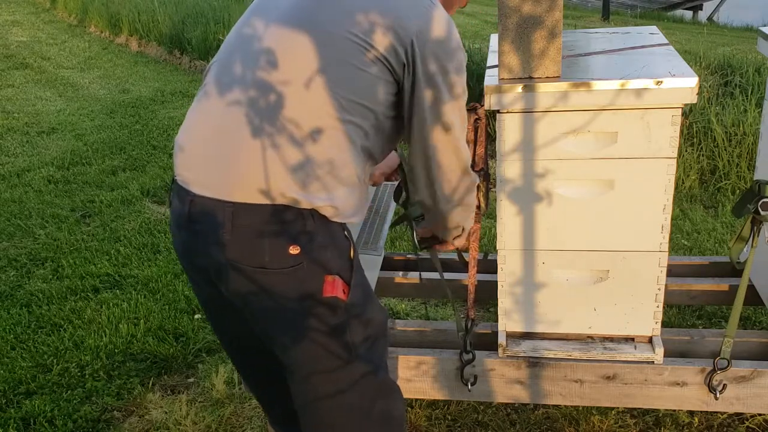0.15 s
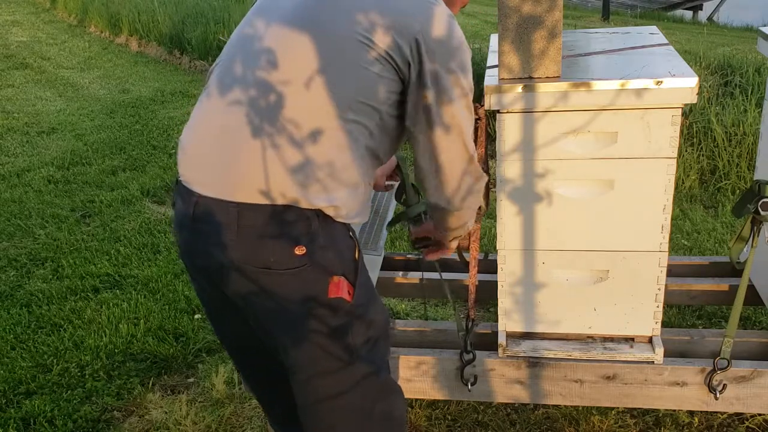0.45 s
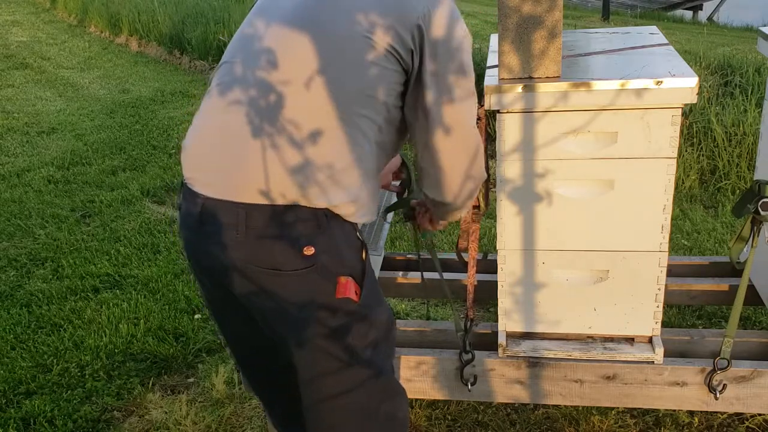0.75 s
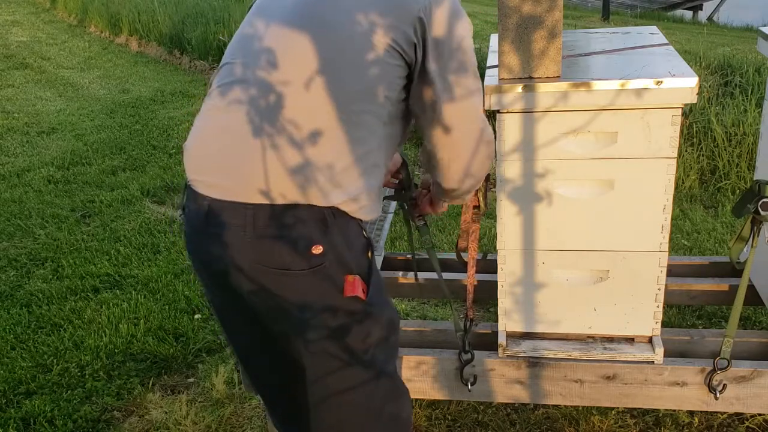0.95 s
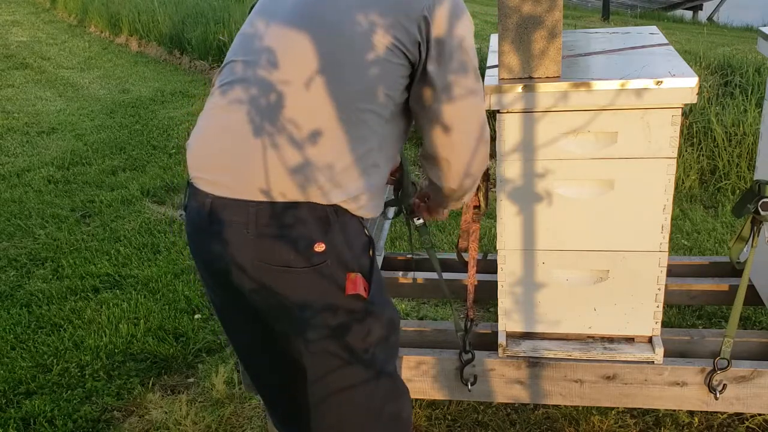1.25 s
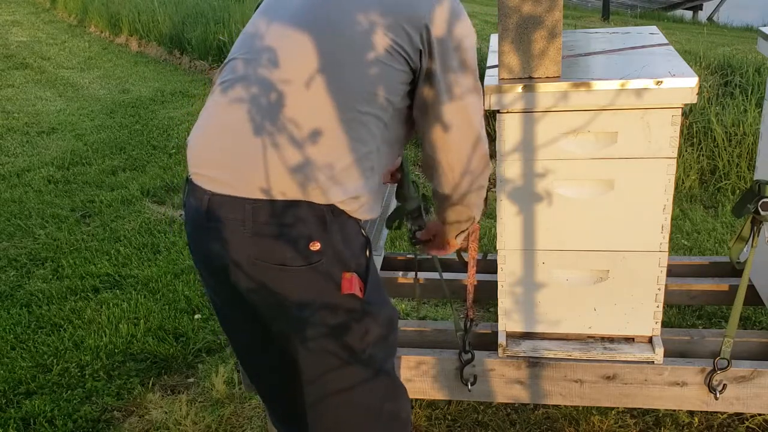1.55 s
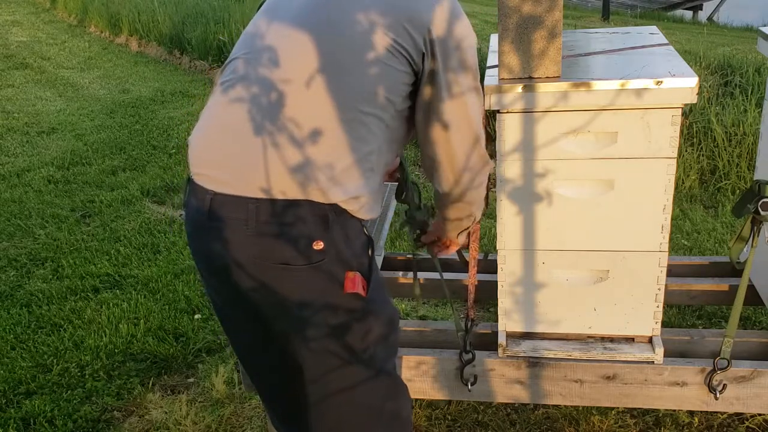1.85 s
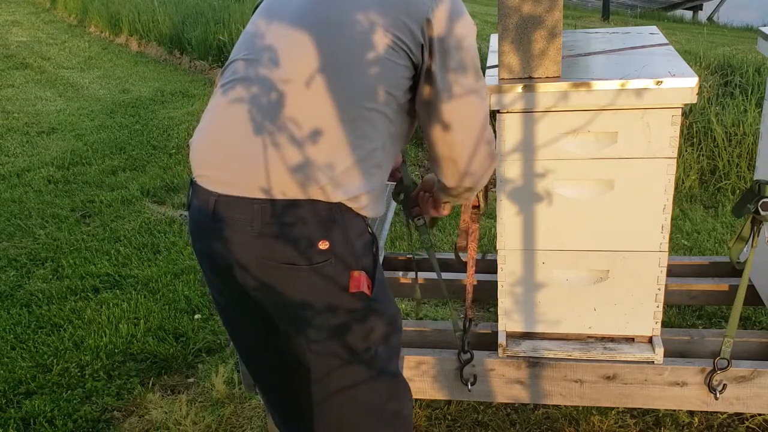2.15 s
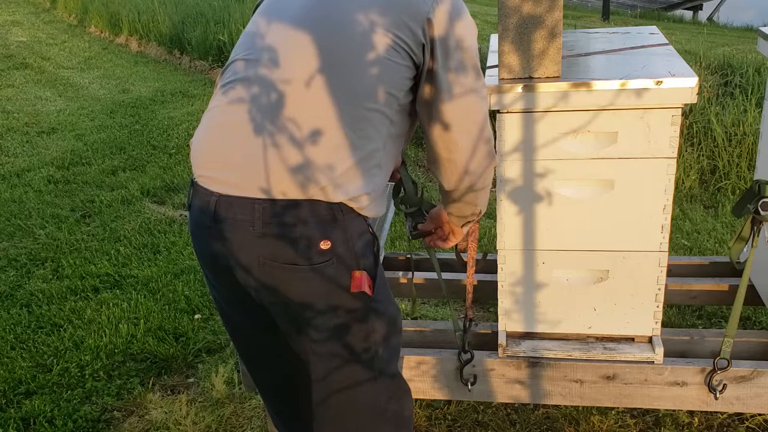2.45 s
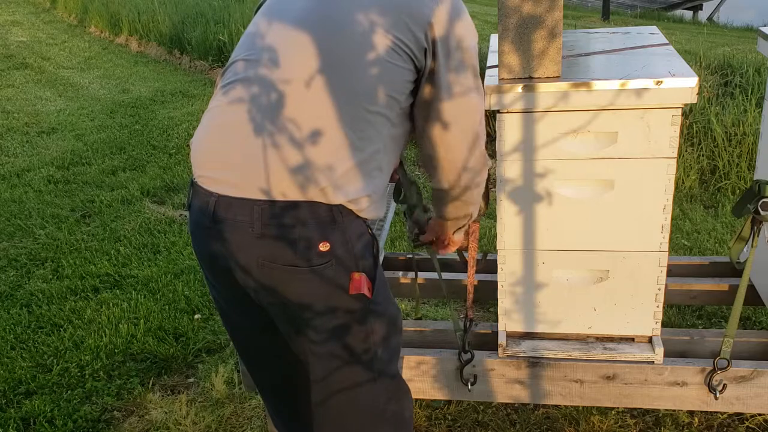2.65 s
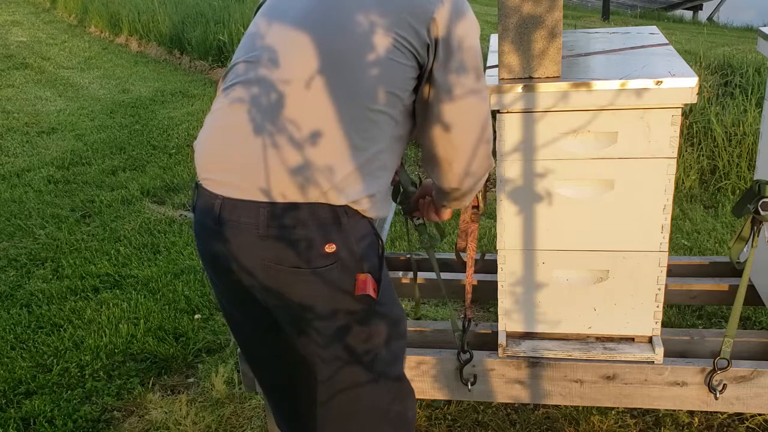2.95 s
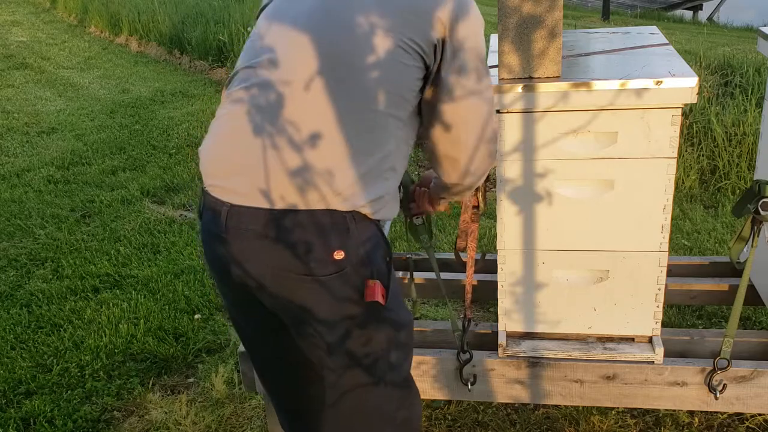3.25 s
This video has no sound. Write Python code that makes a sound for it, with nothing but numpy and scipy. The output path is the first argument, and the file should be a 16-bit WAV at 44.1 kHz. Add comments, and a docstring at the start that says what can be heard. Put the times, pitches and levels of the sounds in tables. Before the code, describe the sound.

Irregular steel ratchet snaps with short squeaks and woody thuds, faint birdsong on a lawn

```python
"""On a lawn, a ratchet strap is cranked tight round a wooden beehive, a few metres away.
Filtered noise bursts make the pawl's snaps, steel scrapes and webbing creaks; the axle squeals in harmonics.
Each tug knocks the boxes, as a noise push through a bank of wooden modes, while handling rustles low.
The yard scatters it in diffuse echoes; songbirds whistle as gliding sines far off over an outdoor rumble."""
import sys
import numpy as np
from scipy import signal
from scipy.fft import rfft, irfft
from scipy.io import wavfile
from scipy.ndimage import uniform_filter1d

SR = 44100
rng = np.random.default_rng(int(sys.argv[2]) if len(sys.argv) > 2 else 0)


def bounce(signal):
    """Save signal as a 16-bit WAV file at the path given by the first command-line argument."""
    frames = np.transpose(np.atleast_2d(signal))
    limited = np.clip(frames, -1, 1)
    pcm = np.round(limited * 32767).astype(np.int16)
    wavfile.write(sys.argv[1], SR, pcm)


N = 149940  # samples, 3.4 s

# Spectrum of the frame's chatter and of the squeaks' rasp, with broad resonances: freq_hz [Hz], gain_db [dB, relative]
FRAME_COLOUR = [(400, -22.5), (1100, -22.5), (1700, -11.5), (2050, -10), (2500, -6), (2900, -5.5),
                (3320, 2), (3700, -5), (4200, 0), (5000, -1.5), (8000, -7), (16000, -15.5)]
SLIDE_RELEASE_S = 0.0056  # decay constant shared by scrapes and creaks
SNAP_RISE_S, SLIDE_RISE_S = 0.00014, 0.00088  # rise constants: a hard snap, a softer slide
LEFT_RIGHT = np.array([[1], [-1]])


def undb(db):
    """Amplitude factor of a level in dB."""
    return 10 ** (np.asarray(db) / 20)


def unit(x):
    """Scaled to rms 1."""
    return x / np.sqrt(np.mean(x ** 2))


def clock():
    """Time of every sample in seconds."""
    return np.arange(N) / SR


def through(x, response):
    """Sound x heard through an impulse response."""
    return signal.fftconvolve(x, response)[:N]


def colour(x, points):
    """Causal minimum-phase filter through (Hz, dB) points that keeps the power of white noise."""
    hz, db = np.array(points).T
    size = 2048
    f = np.maximum(np.arange(size // 2 + 1) * SR / size, 1)
    log_gain = np.log(undb(np.interp(np.log(f), np.log(hz), db)))
    # folding the cepstrum forward in time makes the response causal
    cepstrum = irfft(log_gain)
    cepstrum[1:size // 2] *= 2
    cepstrum[size // 2 + 1:] = 0
    response = irfft(np.exp(rfft(cepstrum)))
    return through(x, response / np.linalg.norm(response))


def walk(rate_hz):
    """Smooth random motion with rms 1, drawn afresh at rate_hz."""
    step = max(int(SR / rate_hz), 1)
    held = rng.standard_normal(N)[np.arange(N) // step]
    return unit(uniform_filter1d(uniform_filter1d(held, step), step))


def gate(start_s, length_s, release_s, rise_s):
    """Envelope: a quick exponential swell up to the start, on for a length, then an exponential release."""
    age = clock() - start_s
    rise = np.minimum(age / rise_s, 0)
    release = np.maximum((age - length_s) / release_s, 0)
    return np.exp(np.maximum(rise - release, -50))


def grit():
    """Dense micro-impacts of uneven size: noise whose level flickers fast."""
    spread_db = 3.5
    return unit(rng.standard_normal(N) * undb(spread_db * walk(1500)))


def ring(modes):
    """Impulse response of a table of decaying sine modes, half a second long, with energy 1."""
    t = clock()[:SR // 2]
    response = sum(undb(db - 60 * t / t60) * np.sin(2 * np.pi * hz * t) for hz, db, t60 in modes)
    return response / np.linalg.norm(response)


def scatter(x, t60_s):
    """Diffuse echoes as decaying noise, different left and right, after a 1.1 ms gap."""
    t = clock()[:SR]
    tails = rng.standard_normal((2, SR)) * np.exp(-np.log(1000) * t / t60_s) * (t > 0.0011)
    return np.array([through(x, tail / np.linalg.norm(tail)) for tail in tails])


def outdoors():
    """Low rumble, nearly alike in both ears, swelling slowly under a thin, wider hiss."""
    # Spectrum of the open air: freq_hz [Hz], gain_db [dB, relative]
    rumble_colour = [(20, -30.5), (40, -0.5), (62, 4), (115, 1), (180, -12), (280, -20), (500, -35.5),
                     (1000, -39.5), (2500, -40), (4500, -50.5), (8000, -57.5), (13000, -43), (17000, -50.5)]
    level_db, swell_db = -53.5, 3.14
    hz, db = np.array(rumble_colour).T
    f = np.maximum(np.arange(N // 2 + 1) * SR / N, 1)
    gain = undb(np.interp(np.log(f), np.log(hz), db))
    mid, side = rfft(rng.standard_normal((2, N))) * gain
    # the stereo width grows with pitch
    side = side * np.clip(f / 1800, .06, .8)
    air = unit(irfft(np.array([mid + side, mid - side]), N))
    return undb(level_db - swell_db * walk(6)) * air


def birds():
    """Distant whistles: gliding, wavering sines that flutter in level, blurred by the trees."""
    # Bird notes: start_s [s], length_s [s], start_hz [Hz], end_hz [Hz], level_db [dB, before flutter and echo]
    notes = [(0, 0.1, 3090, 3245, -68), (0.329, 0.095, 2206, 2860, -67.5), (0.395, 0.051, 3200, 2750, -71),
             (0.409, .08, 2630, 2105, -65), (0.468, 0.12, 2860, 2620, -71.5),
             (0.529, 0.11, 2420, 1984, -61.5), (0.635, .07, 3050, 2570, -70.5), (.76, .13, 2450, 2177, -69),
             (0.956, 0.073, 3550, 3300, -67), (1.495, 0.085, 3020, 2400, -67),
             (1.634, 0.046, 2500, 2170, -67), (1.77, 0.08, 2802, 2928, -64), (1.86, 0.096, 3100, 3400, -70),
             (2.034, 0.077, 2490, 2280, -72), (2.345, .11, 3345, 2710, -60), (2.606, .08, 2930, 2416, -65),
             (2.739, 0.063, 2597, 2296, -65.5), (2.753, 0.14, 3410, 3470, -64.5),
             (3.002, 0.086, 3020, 2620, -66.5), (3.097, 0.16, 3316, 3403, -64.5),
             (3.28, 0.27, 3270, 3250, -72), (3.22, 0.44, 2573, 2400, -69)]
    waver_share, echo_db, echo_t60_s = 0.028, 1, 0.47
    t, out = clock(), np.zeros(N)
    waver = walk(160)
    flutter = undb(-2 + 3 * walk(60))
    for start, length, start_hz, end_hz, db in notes:
        on = (t > start) & (t < start + length)
        progress = (t[on] - start) / length
        hz = (start_hz + (end_hz - start_hz) * progress) * (1 + waver_share * waver[on])
        whistle = np.sin(2 * np.pi * np.cumsum(hz) / SR)
        out[on] += undb(db) * np.sin(np.pi * progress) ** .5 * flutter[on] * whistle
    return out + undb(echo_db) * scatter(out, echo_t60_s)


def handling():
    """Low rustle of sleeves and strap while the lever is worked: coloured noise, almost centred."""
    # Loudness of the rustle over time: time_s [s], level_db [dB, before a random flicker]
    rustle_level = [(0, -67.5), (.55, -61.5), (.9, -46), (1.2, -55.5), (1.42, -55), (1.65, -67), (2.0, -56),
                    (2.3, -52), (2.62, -55), (2.78, -63), (3.05, -61.5), (3.4, -60)]
    # Spectrum of the rustle: freq_hz [Hz], gain_db [dB, relative]
    rustle_colour = [(30, -24), (70, 9.5), (200, 3.5), (320, -15), (450, -12.5), (650, -38.5), (1500, -41),
                     (6000, -36.5), (16000, -50)]
    mid = colour(rng.standard_normal(N), rustle_colour)
    side = colour(rng.standard_normal(N), rustle_colour)
    level_db = np.interp(clock(), *np.array(rustle_level).T) + 2.7 * walk(25)
    return undb(level_db) * (mid + .12 * side * LEFT_RIGHT)


def hive():
    """Each tug jostles the boxes: a dull thud, and wooden modes that vary a little at random from knock to knock."""
    # Tugs that knock the boxes: start_s [s], level_db [dB, relative], thud_hz [Hz, sets the band]
    knocks = [(0.769, -41.5, 194), (0.883, -44.5, 226), (.915, -45, 237.3), (1.047, -33, 172),
              (1.066, -41.5, 200), (1.305, -53, 292), (1.467, -32.5, 218), (1.506, -36.5, 296),
              (1.519, -31, 118), (1.613, -34.5, 280), (1.626, -33.5, 173), (1.724, -34, 185.7),
              (2.102, -38.5, 250), (2.124, -36, 195), (2.154, -40.5, 285), (2.194, -31, 280),
              (2.389, -49.5, 412), (2.447, -36, 290), (2.528, -37, 336), (2.544, -31, 162),
              (2.566, -46.5, 404), (2.813, -46.5, 238), (2.85, -45, 396), (2.934, -34, 538),
              (2.955, -46, 402), (2.996, -46, 280), (3.152, -46, 378)]
    # Resonances of hive and stand, before scatter: freq_hz [Hz], level_db [dB, relative], t60_s [s]
    wood_modes = [(67, 1, .25), (98.3, -3.5, 0.18), (195.2, -5, 0.16), (212, -0.5, 0.082),
                  (245.8, -8, 0.12), (278.8, -9.5, 0.14), (362.2, -7, 0.031), (443, 1.5, 0.086),
                  (520, -11.5, 0.044), (742.4, -8.5, 0.11), (878, -6, 0.05)]
    decay_s, rise_s = 0.008, 0.012  # time constants of the push
    shift_share, mode_scatter_db = 0.05, 0.5  # random spread of the modes from knock to knock
    thud_db, trim_db = -9, -14.5  # thud against the ringing; trim of all knocks
    echo_db, echo_t60_s, echo_width = -10.5, 0.37, 0.4
    out, size = np.zeros(N + SR), SR // 2
    t = clock()[:size]
    for start, db, thud_hz in knocks:
        draws = rng.standard_normal((len(wood_modes), 2))
        modes = [(f * (1 + shift_share * a), g + mode_scatter_db * b, t60)
                 for (f, g, t60), (a, b) in zip(wood_modes, draws)]
        force = rng.standard_normal(size) * np.exp(-t / decay_s) * (1 - np.exp(-t / rise_s))
        band = signal.butter(3, [thud_hz / 2.4, thud_hz * 1.47], "band", fs=SR, output="sos")
        ringing = unit(signal.sosfilt(band, through(force, ring(modes))[:size]))
        thud = unit(signal.sosfilt(band, force))
        first = int(start * SR)
        out[first:first + size] += undb(db + trim_db) * unit(ringing + undb(thud_db) * thud)
    mid, side = scatter(out[:N], echo_t60_s)
    return out[:N] + undb(echo_db) * (mid + echo_width * side * LEFT_RIGHT)


def webbing():
    """The strap slips on the spool in tiny jerks: bursts of flickering, coloured grit."""
    # Slips of the webbing: start_s [s], length_s [s, before release], level_db [dB]
    creaks = [(1.498, 0.022, -51.5), (1.617, 0.023, -49.5), (2.127, 0.0066, -53), (2.147, 0.0068, -50),
              (2.17, 0.015, -54), (2.192, 0.019, -41), (2.44, 0.019, -44.5), (2.545, 0.036, -48),
              (2.911, 0.025, -48), (2.927, 0.043, -46), (2.957, 0.016, -43.5), (2.97, 0.0055, -58)]
    # Spectrum of the creak: freq_hz [Hz], gain_db [dB, relative]
    strap_colour = [(200, -8), (450, 8.5), (750, -4.5), (1100, -8), (2000, -6), (3200, -9), (6000, -13),
                    (15000, -16.5)]
    jerks = unit(grit() * undb(3.9 * walk(300)))
    slips = sum(undb(db) * gate(start, length, SLIDE_RELEASE_S, SNAP_RISE_S) for start, length, db in creaks)
    return colour(jerks * slips, strap_colour)


def axle():
    """Stick-slip squeaks: short harmonic squeals with an unsteady pitch and a little rasp."""
    # Squeaks: start_s [s], length_s [s], pitch_hz [Hz, at the start], glide [share of pitch],
    # level_db [dB], jitter [share of pitch, rms], tilt_db [dB added per harmonic above the first]
    squeaks = [(0.729, 0.025, 3863, -0.088, -43.5, 0.034, 0), (.798, 0.0058, 4700, 0, -48, 0.036, -6),
               (0.838, 0.019, 4020, 0.0081, -59.5, 0.012, -1.5),
               (0.864, 0.024, 3770, 0.14, -44.5, 0.023, 1.5), (0.891, 0.018, 3906, .08, -31.5, 0.034, 1),
               (.911, 0.012, 4220, 0.0023, -31, 0.032, 1.5), (.922, .014, 4190, 0.026, -36.5, 0.061, -5.5),
               (1.023, .012, 4300, -0.037, -32.5, 0.013, -4), (1.274, 0.015, 3930, 0.025, -45.5, 0.09, -7),
               (1.285, 0.028, 4225, -.15, -50, 0.092, -7.5), (1.983, 0.017, 3163, 0.026, -49.5, 0.027, -12),
               (2.107, 0.0082, 4150, -0.007, -34.5, 0.052, -2.5)]
    harmonics_db, rasp_db = [0, -5, -2, -18.5], -19.5  # harmonic levels before the tilt
    t, out = clock(), np.zeros(N)
    wobble = walk(1000)
    rasp = colour(grit(), FRAME_COLOUR)
    for start, length, pitch_hz, glide, db, jitter, tilt_db in squeaks:
        on = (t > start) & (t < start + length)
        progress = (t[on] - start) / length
        hz = pitch_hz * (1 + glide * progress + jitter * wobble[on])
        phase = 2 * np.pi * np.cumsum(hz) / SR
        tone = sum(undb(h + k * tilt_db) * np.sin((k + 1) * phase) for k, h in enumerate(harmonics_db))
        out[on] += undb(db) * np.sin(np.pi * progress) * (tone + undb(rasp_db) * rasp[on])
    return out


def ratchet():
    """Each snap is a hard crack, then chatter and a faint ring-out; snaps and scrapes ring the steel frame."""
    # Pawl snaps: start_s [s], level_db [dB], contact_ms [ms, before release],
    # chatter_db [dB against the snap], body_db [dB of the frame's 2-6 kHz body, before the common trim]
    snaps = [(0.604, -62, 2.1, 7, 14), (0.6245, -41.5, 0.92, -9.5, 9.5), (1.038, -21, 2.2, 0, 4.5),
             (1.4673, -61, 0.89, -10.5, 26), (1.5053, -52, 1.3, -2.5, 11.5), (1.6119, -13, 0.76, -9, 1),
             (2.151, -44.5, 1.5, -7, 15.5), (2.1921, -18.5, 1.7, -0.5, -3.5),
             (2.3895, -45.5, 4.1, -1.5, 10.5), (2.4438, -31, 0.6, -20, 2), (2.529, -30.5, 1.3, -6, 13.5),
             (2.5414, -14, 1.83, -22.5, 2), (2.8456, -25.5, 0.78, -8.5, 3.5), (2.9934, -25, 1.7, -12, 7.5),
             (3.1504, -32, 3, -2.5, 4)]
    # Steel sliding on steel: start_s [s], length_s [s, before release], level_db [dB],
    # body_db [dB of the frame's 2-6 kHz body, before the common trim]
    scrapes = [(0.651, 0.014, -62.5, 5.5), (.76, 0.013, -64, 16.5), (1.022, .01, -52, 3),
               (1.034, .006, -26.5, 0.5), (1.279, 0.032, -53.5, 11.5), (1.335, .004, -58, 11),
               (1.603, .01, -44, 8.5), (1.9214, 0.011, -30.5, -10), (1.935, 0.01, -31.5, 4),
               (2.104, 0.01, -54, 16), (2.35, 0.032, -66.5, 12), (2.42, .006, -66, 20),
               (2.804, 0.017, -39.5, 7), (3.37, .02, -69, 11)]
    # Spectrum of the first hard contact: freq_hz [Hz], gain_db [dB, relative]
    crack_colour = [(500, -33.5), (1200, -27.5), (2500, -15), (4000, -10), (6500, -9), (9000, -12),
                    (11000, 1), (13500, -3.5), (15500, -0.5), (17000, -5)]
    # Spectrum of the bright chatter and scrape: freq_hz [Hz], gain_db [dB, relative]
    bright_colour = [(1500, -43), (4000, -17), (6700, -19.5), (9000, 1.5), (11000, 1), (13000, 1),
                     (15500, -2), (17000, -0.5)]
    # Resonances of the ratchet frame: freq_hz [Hz], level_db [dB, relative], t60_s [s]
    frame_modes = [(1850, 0.5, 0.39), (2509, 6.5, .4), (3540, 16.5, .1), (3900, -8.5, 0.25),
                   (10090, -11, .22), (10900, 15, .2), (11450, -34.5, .2), (12150, -22.5, 0.22),
                   (12100, -5, .18), (13600, 3, .22)]
    crack_release_s, chatter_s, ring_out_s = 0.00068, 0.0055, 0.049  # decay constants
    ring_out_db, body_trim_db, frame_db, uneven_db = -31.5, -10, -30, 2.2

    contact = sum(undb(db) * gate(start, ms / 1000, crack_release_s, SNAP_RISE_S)
                  for start, db, ms, _, _ in snaps)
    # noise of constant size and random sign keeps the crack hard
    crack = colour(np.sign(rng.standard_normal(N)) * contact, crack_colour)

    strokes = []  # pairs of envelope and body level
    for start, db, _, chatter_db, body_db in snaps:
        chatter = gate(start, 0, chatter_s, SLIDE_RISE_S)
        ring_out = undb(ring_out_db) * gate(start, 0, ring_out_s, SNAP_RISE_S)
        strokes.append((undb(db + chatter_db) * (chatter + ring_out), body_db))
    for start, length, db, body_db in scrapes:
        strokes.append((undb(db) * gate(start, length, SLIDE_RELEASE_S, SLIDE_RISE_S), body_db))

    uneven = unit(undb(uneven_db * walk(400)))
    bright_envelope = sum(envelope for envelope, _ in strokes)
    body_envelope = sum(envelope * undb(body_trim_db + body_db) for envelope, body_db in strokes)
    bright = colour(grit() * uneven * bright_envelope, bright_colour)
    body = colour(grit() * uneven * body_envelope, FRAME_COLOUR)
    metal = crack + bright + body
    return metal + undb(frame_db) * through(metal, ring(frame_modes))


def ports(x):
    """Phase and level differences between two microphone ports, varying with frequency."""
    # Phase between the ports: freq_hz [Hz], left_lead [radians]
    phase_points = [(200, 0), (2000, 0.2), (4000, -1.42), (7500, -1), (9000, -1.3), (11000, 0.75),
                    (16000, 1.4)]
    # Level between the ports: freq_hz [Hz], left_minus_right_db [dB]
    balance_points = [(200, 1), (700, -0.5), (1290, -2), (2380, 3), (4400, -2), (8120, -1), (15000, -4)]
    log_f = np.log(np.maximum(np.arange(N // 2 + 1) * SR / N, 1))
    phase_hz, phase = np.array(phase_points).T
    balance_hz, balance_db = np.array(balance_points).T
    phase = np.interp(log_f, np.log(phase_hz), phase)
    balance_db = np.interp(log_f, np.log(balance_hz), balance_db)
    half = LEFT_RIGHT / 2  # each side takes half of the difference
    return irfft(rfft(x) * undb(half * balance_db) * np.exp(1j * half * phase), N)


def scene():
    """The ratchet sits slightly off centre; near things and the wider yard echo it."""
    squeaks = axle()
    tool = ratchet() + squeaks + webbing()
    near = undb(-6) * scatter(tool, 0.092)
    yard = undb(-20) * scatter(tool, 0.34)
    squeak_echo = undb(-11) * scatter(squeaks, 0.17)
    echoes = near + yard + squeak_echo
    return outdoors() + birds() + handling() + hive() + echoes + ports(tool)


def record(dry):
    """The recorder cuts the deepest bass below 30 Hz and, steeply, the top above 16.1 kHz."""
    dry = signal.sosfilt(signal.butter(2, 30, "high", fs=SR, output="sos"), dry)
    return signal.sosfilt(signal.ellip(8, .2, 70, 16100, fs=SR, output="sos"), dry)


dry = scene()
out = record(dry)
bounce(out)
```